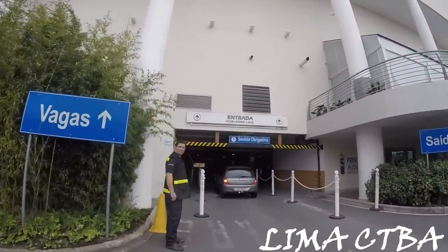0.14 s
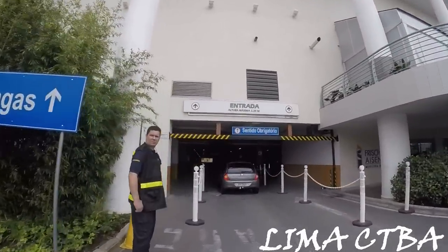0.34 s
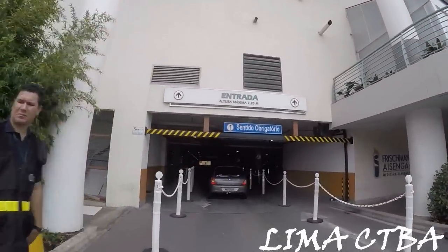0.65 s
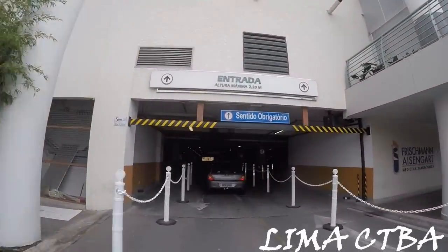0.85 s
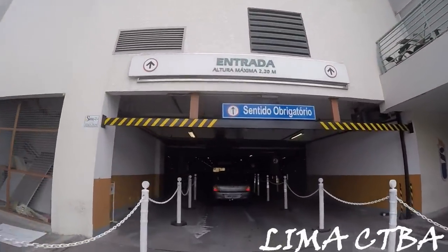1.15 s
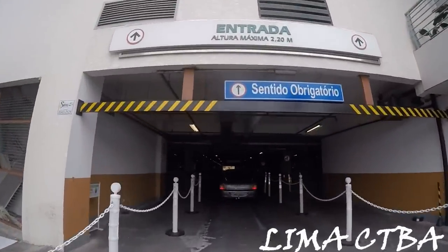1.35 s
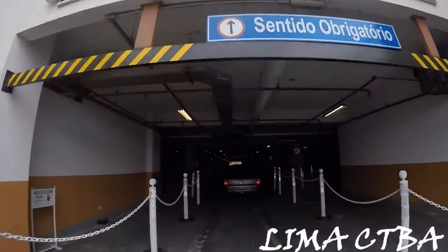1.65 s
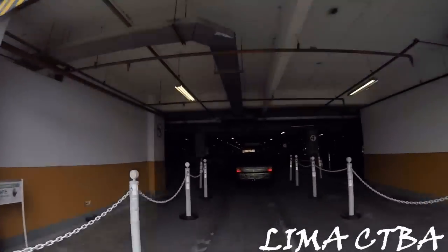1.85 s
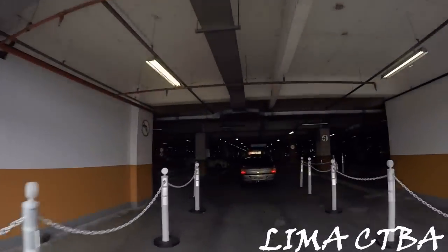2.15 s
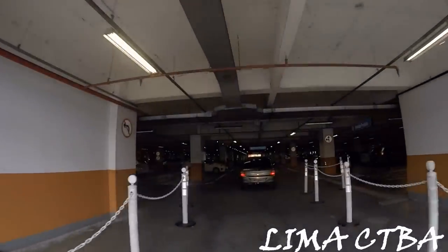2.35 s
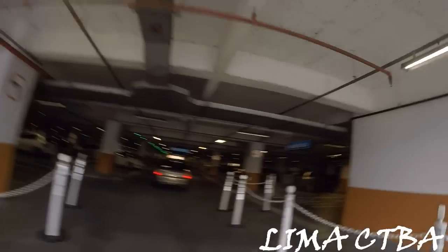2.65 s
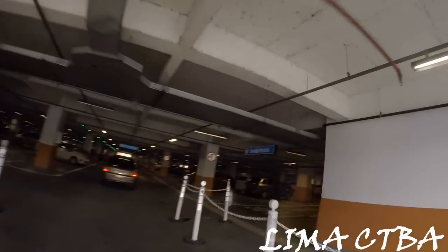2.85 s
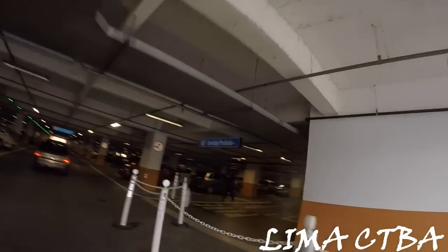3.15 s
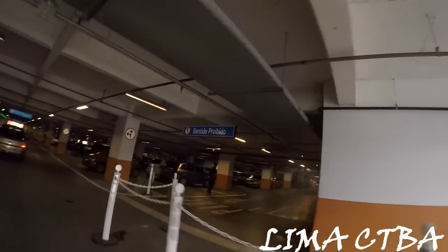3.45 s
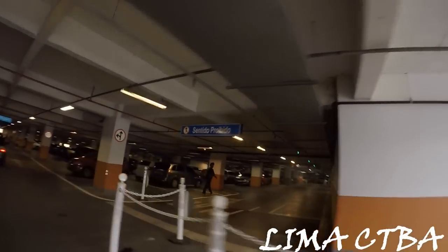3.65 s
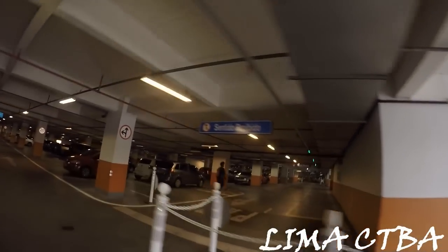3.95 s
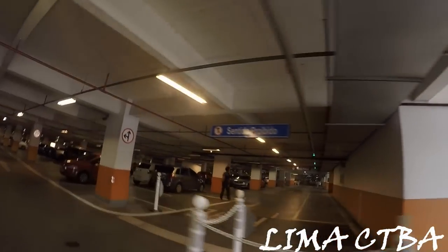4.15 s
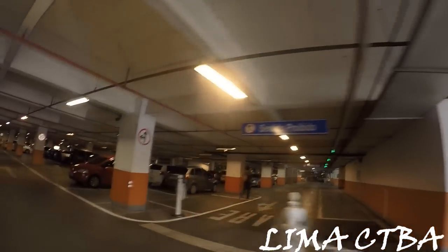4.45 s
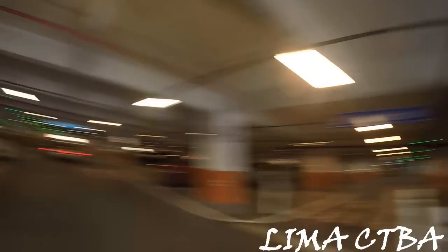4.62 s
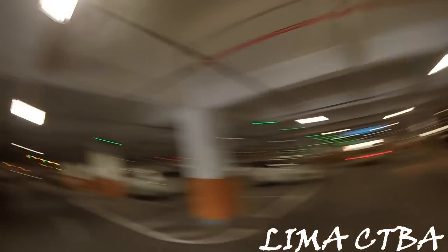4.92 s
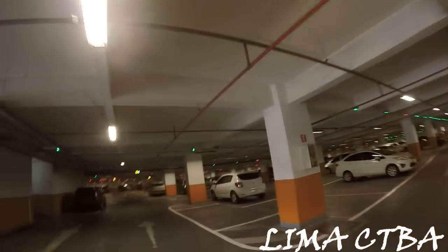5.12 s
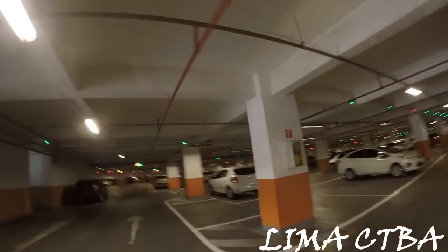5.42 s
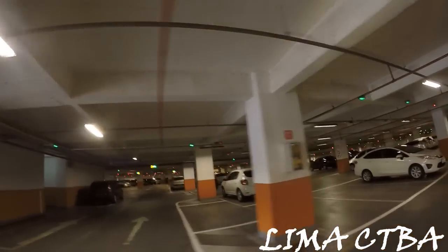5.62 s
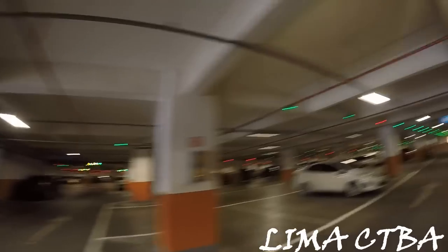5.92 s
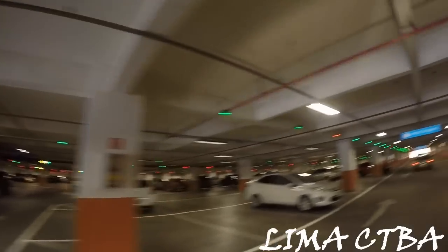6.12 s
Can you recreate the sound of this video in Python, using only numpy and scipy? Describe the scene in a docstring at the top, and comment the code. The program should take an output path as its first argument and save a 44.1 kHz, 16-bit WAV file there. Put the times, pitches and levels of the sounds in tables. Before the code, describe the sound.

A motorcycle rolls slowly into a concrete parking garage, heard close from the rider's seat. The engine runs down to idle with uneven exhaust thumps, whining gears and clattering valves, over a low rumble and faint tyre hiss. Under the ceiling the garage adds a low boom. Late on comes a short blip of throttle, then the engine drops below idle and chugs under load.

```python
"""Concrete parking garage, microphone at the rider's seat, an arm's length from a motorcycle's engine.
The bike rolls in slowly and runs down to idle with uneven exhaust thumps, gears whining, valves clattering.
From about 2 s, under the ceiling, the garage booms on the low engine orders.
Near 4.7 s comes a short blip of throttle; then the clutch bites and the engine lugs."""
import sys
import numpy as np
from scipy import signal
from scipy.fft import rfft, irfft, next_fast_len
from scipy.io import wavfile

SR = 44100
rng = np.random.default_rng(int(sys.argv[2]) if len(sys.argv) > 2 else 0)


def digitize_waveform(pressure):
    """Quantize a signal to 16-bit integers and store it at the path in sys.argv[1].

    Rows of a 2-D input are taken as channels; values are limited to [-1, 1].
    """
    field = np.atleast_2d(pressure).T
    bounded = np.clip(field, -1, 1)
    quanta = np.round(bounded * 32767).astype(np.int16)
    wavfile.write(sys.argv[1], SR, quanta)


N = 276727
TIME = np.arange(N) / SR
IDLE_HZ, CRUISE_DB = 38, -28  # cruise: the throttle that just holds the speed

# crank speed, one firing a turn: run-down, blip, clutch biting (time [s], speed [Hz])
CRANK_SPEED = [(0, 57.5), (.25, 54), (.65, 50), (1.05, 47.2), (1.5, 44.3), (1.9, 42.4), (2.12, 40.1),
               (2.81, 40.1), (2.95, 38.1), (3.5, 38.5), (3.8, 37.3), (4.56, 38.2), (4.84, 50.1),
               (4.96, 50.5), (5.1, 45.2), (5.59, 37.7), (5.8, 32.5), (6.27, 36.6)]
# throttle, as the level of the exhaust's rasp (time [s], level [dB])
THROTTLE_DB = [(0, -25), (.15, -30), (1.9, -33.5), (2.55, -27), (2.8, -29), (3.2, -24.5), (3.5, -29.5),
               (4.2, -32), (4.53, -31.5), (4.68, -24.5), (5.1, -21), (5.3, -25), (6.27, -23.5)]
# strength of ordinary firings (time [s], level [dB])
FIRING_DB = [(0, -18.5), (1.1, -17.5), (2.1, -15), (2.6, -21.5), (4.4, -15), (4.8, -15.5), (5.5, -12),
             (6.27, -13)]
# runs of hard firings, each kicking the crank ahead (time [s], firings [count], level [dB])
HARD_RUNS = [(0.011, 2, -6), (0.122, 1, -4.5), (0.291, 2, -13.5), (0.581, 2, -8.5), (0.963, 2, -10.5),
             (1.179, 3, -6.5), (1.313, 3, -3), (1.444, 1, -8), (1.579, 2, -5), (1.716, 2, -5.5),
             (1.789, 1, -9), (1.884, 1, -10), (2.224, 1, -6.5), (2.275, 2, -7.5), (5.775, 1, -5.5),
             (5.869, 1, -2), (6.019, 2, -6)]
# turbulent exhaust gas (frequency [Hz], level [dB])
GAS_SPECTRUM = [(35, -19.5), (55, -23.5), (75, 3.5), (100, 4), (150, 9.5), (220, -3), (290, -1),
                (380, -5.5), (450, -9), (700, -18), (1500, -43), (5000, -70.5)]
# the pipe's higher resonances (frequency [Hz], level [dB])
PIPE_SPECTRUM = [(60, -33.5), (130, -4), (175, -0.5), (240, 4), (300, -5), (335, -6), (375, -4),
                 (440, -21.5), (560, -3.5), (800, -36.5), (3000, -66.5)]
# how the gear casing radiates (frequency [Hz], level [dB])
CASING_SPECTRUM = [(600, -5.5), (1150, -1), (1650, 0), (2000, -13), (2500, -12), (3150, -16), (3600, -26.5),
                   (4100, -23), (4700, -22), (5200, -41.5), (7000, -40.5)]
# the engine block's ring (frequency [Hz], level [dB])
BLOCK_SPECTRUM = [(200, -4.5), (380, -2.5), (520, 5.5), (660, 4), (800, -2.5), (1050, 2.5), (1400, -2),
                  (1800, -12), (3000, -29), (8000, -62)]
# valve clatter on the covers (frequency [Hz], level [dB])
VALVE_SPECTRUM = [(600, -17.5), (1500, 2.5), (1900, -1), (2250, -2.5), (2800, -6.5), (3400, -12),
                  (4200, -14.5), (6000, -29), (12000, -36)]
# strength of that clatter (time [s], level [dB])
VALVE_DB = [(0, -38.5), (1, -41.5), (3.2, -36.5), (3.55, -42), (4.55, -40), (5.3, -39.5), (6.27, -37)]
# ticks of loose metal (time [s], level [dB])
METAL_TICKS = [(.6, -54), (3.783, -51), (4.155, -45.5)]
# the crank's shaking of the frame (time [s], level [dB])
SHAKE_DB = [(0, -16), (2.2, -29), (3.8, -32), (5, -44), (5.9, -52)]
# how the space between floor and ceiling carries an engine order (frequency [Hz], level [dB])
CEILING_RESPONSE = [(65, -5), (80, -5.5), (105, 4), (120, -0.5), (150, 0.5), (195, -21.5), (240, -14),
                    (300, -23.5), (400, -21)]
# crests of standing waves that the rider passes (time [s], half-length [s], order [number], level [dB])
WAVE_CRESTS = [(2.263, 0.28, 3, -19.5), (2.624, 0.27, 4, -17), (2.766, 0.33, 3, -20), (3.08, .25, 3, -19.5),
               (3.16, 0.067, 4, -20), (3.447, 0.2, 3, -10), (3.868, .3, 4, -17), (3.926, 0.55, 2, -18),
               (4.464, 0.35, 3, -15.5), (4.938, 0.58, 2, -22.5), (5.587, 0.19, 6, -23),
               (6.067, 0.2, 5, -25)]
# the garage's reverberation (frequency [Hz], time to fall 60 dB [s])
GARAGE_DECAY = [(80, 0.59), (250, 0), (1200, 1.23), (4000, 0), (12000, 1.46)]
# its strength on the way in (time [s], level [dB])
GARAGE_DB = [(0, -8), (1.5, -5), (2.5, -3), (6.27, -5)]
# hiss of air and tyres (frequency [Hz], level [dB])
AIR_SPECTRUM = [(2000, -13.5), (3600, -13), (4800, 6.5), (5600, 4.5), (6700, 2), (7700, -2.5), (8600, -8.5),
                (11000, -12), (13500, -19.5), (15000, -22)]
# that hiss, sinking in the slow stretch before the turn (time [s], level [dB])
AIR_DB = [(0, -50.5), (1.6, -52.5), (2.6, -51.5), (3.2, -56), (3.55, -61), (4.57, -63.5), (4.66, -55),
          (4.88, -51), (5.6, -54), (6.27, -51.5)]
# low rumble (frequency [Hz], level [dB])
ROLLING_SPECTRUM = [(20, -20), (38, -5.5), (48, -2.5), (60, -10), (90, -13), (300, -45), (2000, -110)]
# that rumble, dying away in the turn (time [s], level [dB])
ROLLING_DB = [(0, -27.5), (4.2, -31), (5, -40)]


def exhaust(turns, puff_hz=103, uneven_db=4, pitch_spread=0.052, jitter_s=0.0014, thump_db=1, sag_db=3):
    """A puff per firing, each with its own strength and burn time; weak in the sags, hard in the surges."""
    hard = [(s + k / speed_at(s), db + thump_db, puff_hz)
            for s, firings, db in HARD_RUNS for k in range(firings)]
    at = np.flatnonzero(np.diff(np.floor(turns)))
    strength, burn, delay = np.clip(rng.standard_normal((SR // 100, 3))[:len(at)], -2, 1.5).T
    level_db = curve(FIRING_DB)[at] + uneven_db * strength + sag_db * np.minimum(surge()[at], 0)
    ordinary = np.c_[TIME[at] + jitter_s * delay, level_db, puff_hz * np.exp(pitch_spread * burn)]
    clear_of_hard = abs(TIME[at, None] - np.array(hard)[:, 0]).min(1) > .012
    out = np.zeros(N)
    for s, db, hz in list(ordinary[clear_of_hard]) + hard:
        pulse = amp(db) * puff(hz)
        add(out, s - len(pulse) / SR / 2, pulse)
    return out


def puff(hz):
    """One exhaust pulse: a deep swing between two lesser ones."""
    u = (np.pi * hz * np.arange(-SR // 50, SR // 50) / SR) ** 2
    return (2 * u - 1) * np.exp(-u)


def silencer(x, low_cut_hz=57):
    """The small outlet radiates little deep bass."""
    return signal.sosfiltfilt(signal.butter(3, low_cut_hz, "high", fs=SR, output="sos"), x)


def rasp(turns, gas_db=4, front_db=-4, steady=0.73, decay_turns=0.94, uneven=0.19, sharpness=120):
    """Each firing sends a sharp front down the pipe, followed by a burst of turbulence."""
    bursts = steady + np.exp(-(turns % 1) / decay_turns)
    gas = noise(GAS_SPECTRUM, bursts)
    fronts = -np.exp(sharpness * (np.cos(2 * np.pi * turns) - 1)) * (1 + uneven * wander(21))
    pull = unit(amp(curve(FIRING_DB) / 2))  # the fronts are strongest while the engine pulls
    pipe = pull * colour(fronts, PIPE_SPECTRUM)
    return amp(curve(THROTTLE_DB)) * (amp(gas_db) * gas + amp(front_db) * pipe)


def crank(hunting=0.01209, hunting_hz=9, kick=1.624):
    """Turns per second: the set speed, the surges, and a little hunting above idle on a shut throttle."""
    speed = curve(CRANK_SPEED)
    coasting = np.clip((speed - IDLE_HZ) / 10, 0, 1) * (curve(THROTTLE_DB) < CRUISE_DB)
    return speed * (1 + hunting * coasting * wander(hunting_hz)) + kick * surge()


def surge(width_s=0.0376, lag_s=0.007):
    """Each run of hard firings lifts the engine briefly, with a sag on either side."""
    out, t = np.zeros(N), np.arange(-SR // 4, SR // 4) / SR
    u = (t / width_s) ** 2
    for s, firings, db in HARD_RUNS:
        middle = s + (firings - 1) / 2 / speed_at(s)
        add(out, middle + lag_s + t[0], firings * amp(db) * (1 - u) * np.exp(-u / 2))
    return out


def lugging(speed):
    """0 at idle and above, 1 once the clutch has dragged the engine well below it."""
    return np.interp(speed, [34, 37], [1, 0])


def gears(turns, speed, mesh_order=31.3, level_db=-31, db_per_hz=0.2129, rough=0.86, slack_db=-7):
    """Teeth mesh at a multiple of the crank speed; each firing hurries the crank, so the whine warbles."""
    pace = speed / speed.mean()
    # the slower the flywheel, the less it evens out the firings
    sway = (0.026 * np.sin(2 * np.pi * turns) + .03 * wander(40.98)) / pace ** 1.303
    mesh = 2 * np.pi * mesh_order * (turns + np.cumsum(speed * sway) / SR)
    # below idle the teeth rattle loose: the whine fades to a whirr at its octave
    loose_db = slack_db * lugging(speed)
    # throttle presses the teeth together: a louder note with duller overtones
    load = np.maximum(curve(THROTTLE_DB) - CRUISE_DB, 0)
    # the overtones come and go with the clatter of the same casing
    overtone_db = .6 * (curve(VALVE_DB) - curve(VALVE_DB).mean()) - 0.18 * load
    tone = np.zeros(N)
    for k in (1, 2, 3):
        backlash_hz = 100 * np.sqrt(k)  # backlash makes the contact come and go
        contact = (1 + rough * wander(backlash_hz)) * np.cos(k * mesh)
        contact += rough * wander(backlash_hz) * np.sin(k * mesh)
        brightness = pace ** (0.34 * (k - 1))  # faster teeth strike brighter
        partial_db = loose_db * (k != 2) + (0.15 * load if k == 1 else overtone_db)
        tone += contact * brightness * amp(partial_db)
    return amp(level_db + db_per_hz * (speed - IDLE_HZ)) * colour(tone, CASING_SPECTRUM)


def valve_taps(turns, steady=2.3, decay=0.31, uneven=0.77):
    """Valves and chain tap twice a turn: an uneven envelope on a steady floor."""
    return steady + np.exp(-((2 * turns) % 1) / decay + uneven * np.minimum(wander(60), 2))


def clatter(taps, speed, block_db=-32, db_per_hz=0.2142, knock_db=4):
    """The taps ring the covers and the block; the block is louder at speed and knocks when lugging."""
    ring_db = block_db + db_per_hz * (speed - IDLE_HZ) + knock_db * lugging(speed)
    block = amp(ring_db) * noise(BLOCK_SPECTRUM, taps)
    covers = amp(curve(VALVE_DB)) * noise(VALVE_SPECTRUM, taps)
    return block + covers


def frame_shake(turns):
    """The crank shakes the frame under the seat once a turn."""
    return -amp(curve(SHAKE_DB)) * np.cos(2 * np.pi * turns)


def ticks(ring_hz=10000, width_hz=1400, decay_s=0.0027):
    """Tiny bright ticks of loose metal."""
    strikes, t = np.zeros(N), TIME[:SR // 20]
    ring = wander(width_hz / 2) * np.cos(2 * np.pi * ring_hz * TIME)
    for s, db in METAL_TICKS:
        add(strikes, s, amp(db) * np.exp(-t / decay_s))
    return strikes * ring


def boom(turns, speed, drone_db=-21, surge_db=5, waver=0.37, drift_rad=0.86):
    """Low engine orders stand between floor and ceiling, growing with throttle and surges."""
    throttle_db = 0.68 * (curve(THROTTLE_DB) - CRUISE_DB)
    ceiling_db = .8 * (curve(GARAGE_DB) - GARAGE_DB[-1][1])
    drive = amp(drone_db + throttle_db + ceiling_db + surge_db * np.tanh(surge()))
    out = np.zeros(N)
    for k in range(2, 8):
        gain = drive * amp(read(CEILING_RESPONSE, k * speed)) * (1 + waver * wander(hz=7))
        for s, half_s, order, db in WAVE_CRESTS:
            if order == k:
                add(gain, s - half_s, amp(db) * np.hanning(2 * round(half_s * SR)) ** 2)
        # a standing wave lags the puff that drives it, by an angle that drifts as the bike rolls on
        lag = np.pi / 3 + drift_rad * wander(hz=2.45)
        out -= gain * np.cos(2 * np.pi * k * turns - lag)
    return out


def garage(x, echoes_per_s=2000, first_echo_s=.008):
    """Sparse reflections from the concrete all round, each band dying at its own speed."""
    echoes = rng.standard_normal(SR) * (rng.random(SR) < echoes_per_s / SR) * (TIME[:SR] > first_echo_s)
    hz, t, bands = signal.stft(echoes, SR, nperseg=256)
    decay = amp(-60 * t / read(GARAGE_DECAY, hz)[:, None])
    tail = signal.istft(bands * decay, SR, nperseg=256)[1]
    return unit(signal.fftconvolve(x, tail)[:N]) * np.std(x)


def hiss(taps):
    """Air and tyres hiss, fluttering in step with the valves."""
    return amp(curve(AIR_DB)) * noise(AIR_SPECTRUM, taps)


def rumble():
    """Tyres on concrete and the garage's low drone, independent of the engine."""
    return amp(curve(ROLLING_DB)) * noise(ROLLING_SPECTRUM)


def amp(db):
    """Decibels to gain."""
    return 10 ** (np.asarray(db) / 20)


def unit(x):
    """Scales to rms 1."""
    return x / np.sqrt(np.mean(x ** 2) + 1e-20)


def curve(rows):
    """A time table, sample by sample."""
    return np.interp(TIME, *np.transpose(rows))


def speed_at(s):
    """The set crank speed at time s."""
    return np.interp(s, *np.transpose(CRANK_SPEED))


def read(points, hz):
    """A frequency table, read on a log axis."""
    f, value = np.transpose(points)
    return np.interp(np.log(hz + 1), np.log(f + 1), value)


def colour(x, spectrum):
    """Filters x by a spectrum, at rms 1."""
    size = next_fast_len(N)
    gain = amp(read(spectrum, np.fft.rfftfreq(size, 1 / SR)))
    return unit(irfft(rfft(x, size) * gain, size)[:N])


def noise(spectrum, envelope=1):
    """Noise under an envelope, then coloured, at rms 1."""
    return colour(envelope * rng.standard_normal(N), spectrum)


def wander(hz):
    """Smooth random motion up to a rate, at rms 1."""
    slow = TIME[::32]
    size = next_fast_len(len(slow))
    f = np.fft.rfftfreq(size, slow[1])
    smooth = irfft(rfft(rng.standard_normal(size)) / (1 + (f / hz) ** 4), size)[:len(slow)]
    return np.interp(TIME, slow, unit(smooth))


def add(mix, s, sound):
    """Mixes a sound in from time s."""
    start = round(s * SR)
    sound = sound[max(-start, 0):]
    part = mix[max(start, 0):][:len(sound)]
    part += sound[:len(part)]


def scene():
    """Close up, the engine's sources follow the crank; the garage answers more as the ceiling closes in."""
    speed = crank()
    turns = np.cumsum(speed) / SR
    tailpipe = silencer(exhaust(turns)) + rasp(turns)
    whine = gears(turns, speed)
    taps = valve_taps(turns)
    running_noise = whine + clatter(taps, speed) + hiss(taps)
    room = amp(curve(GARAGE_DB)) * (amp(-0.5) * garage(tailpipe) + amp(-1) * garage(running_noise))
    surroundings = room + boom(turns, speed) + rumble()
    return (tailpipe + running_noise + frame_shake(turns) + ticks() + surroundings)[None]


def record(dry, low_cut_hz=32, high_cut_hz=15150):
    """The microphone at the seat: mono, with a bass roll-off and a band limit."""
    thin = signal.sosfiltfilt(signal.butter(2, low_cut_hz, "high", fs=SR, output="sos"), dry)
    band_limit = signal.firwin(511, high_cut_hz, window=("kaiser", 9), fs=SR)
    return signal.oaconvolve(thin, band_limit[None], "same")


dry = scene()
out = record(dry)
digitize_waveform(out)
```